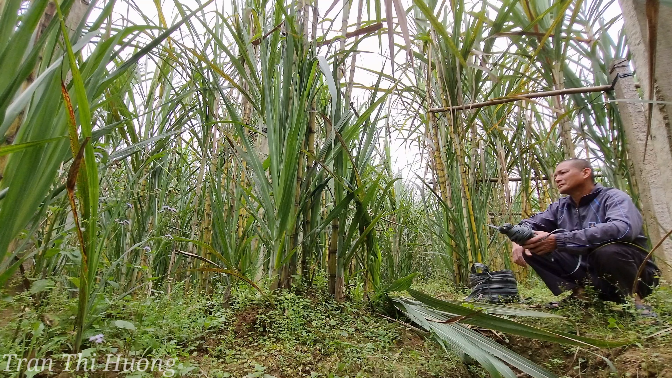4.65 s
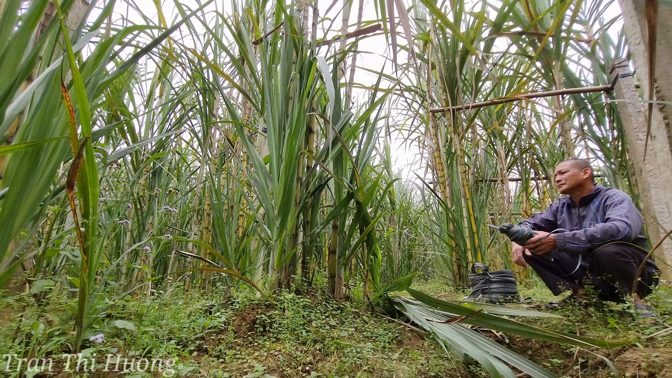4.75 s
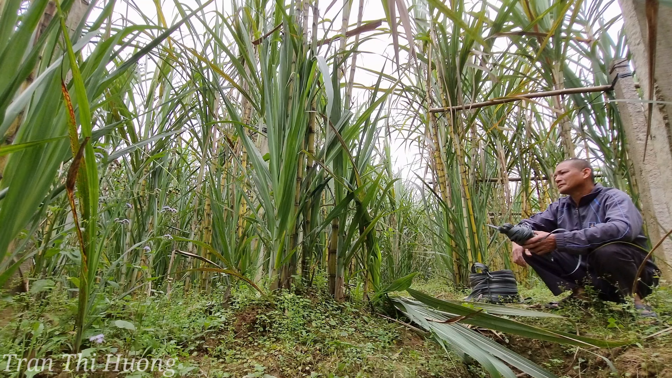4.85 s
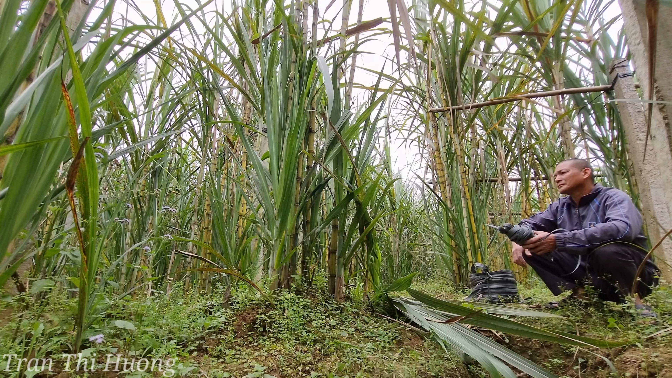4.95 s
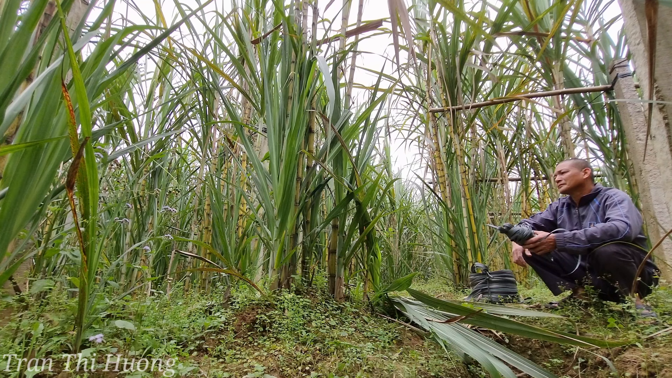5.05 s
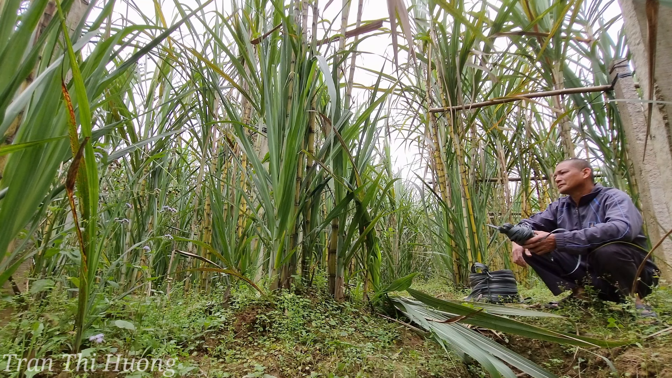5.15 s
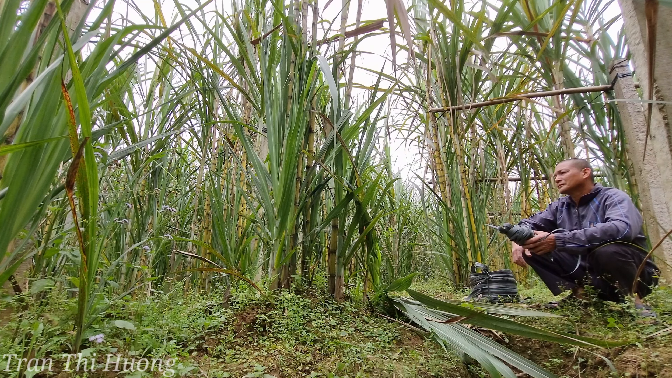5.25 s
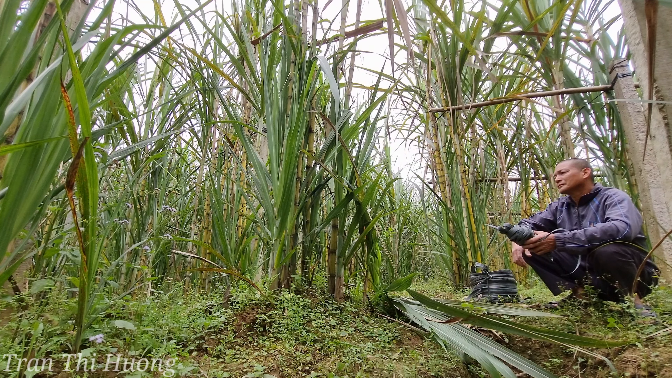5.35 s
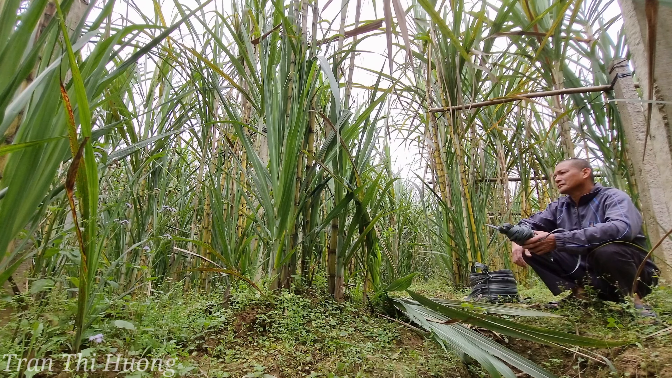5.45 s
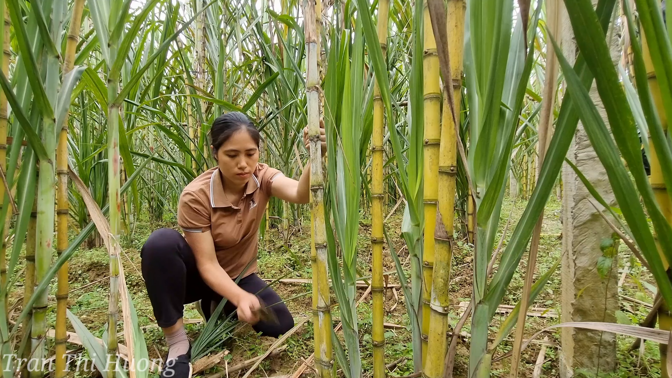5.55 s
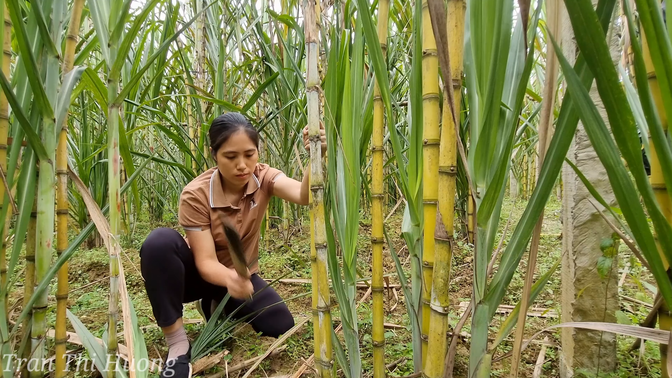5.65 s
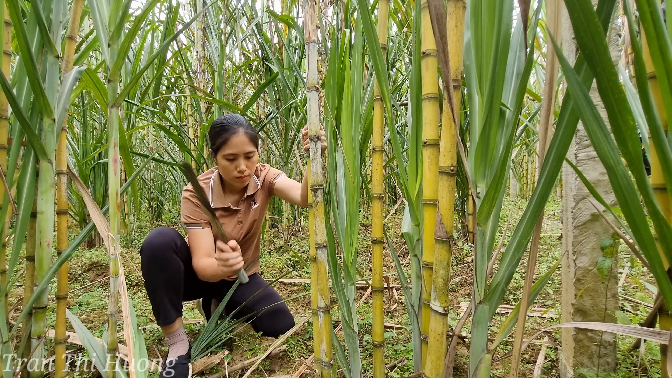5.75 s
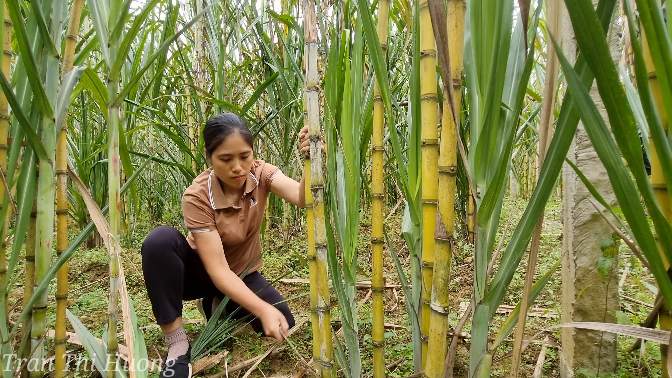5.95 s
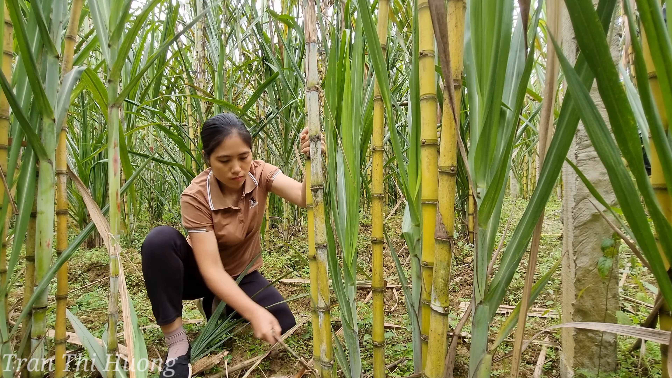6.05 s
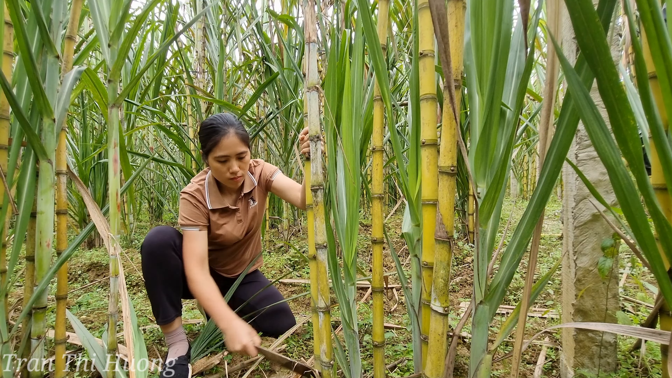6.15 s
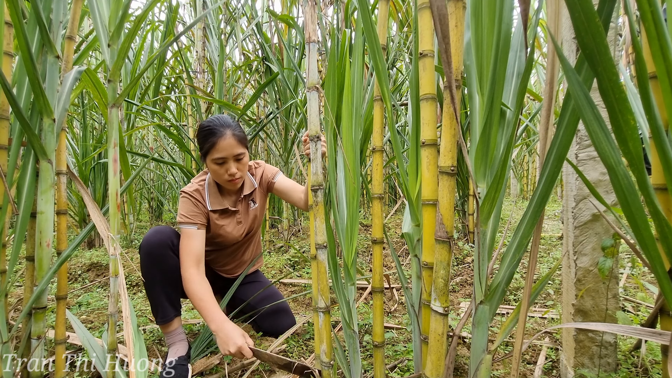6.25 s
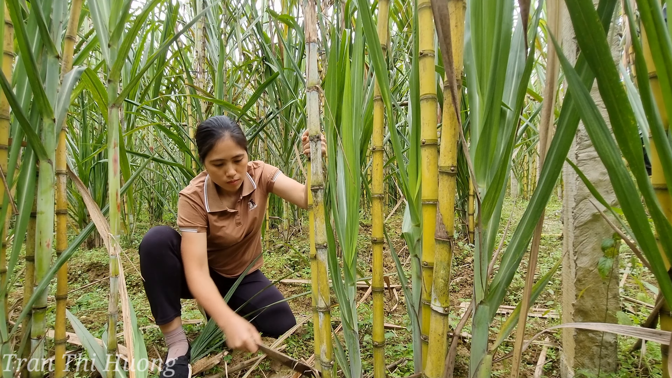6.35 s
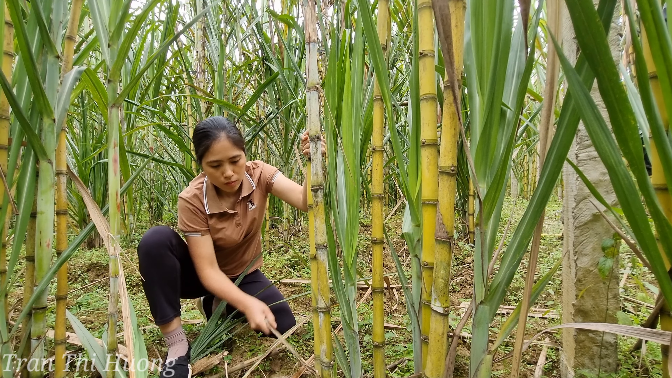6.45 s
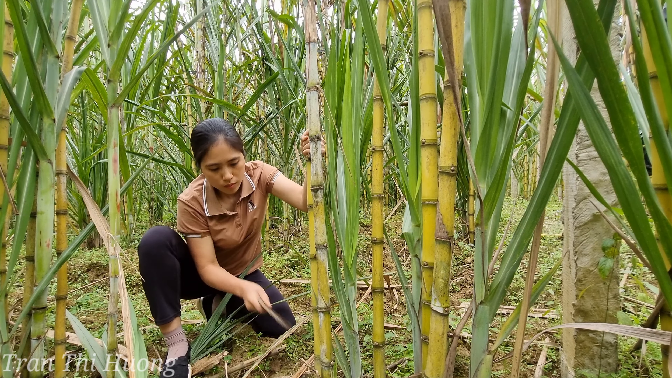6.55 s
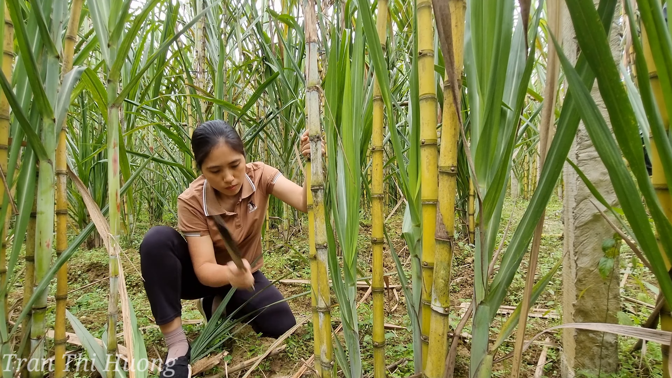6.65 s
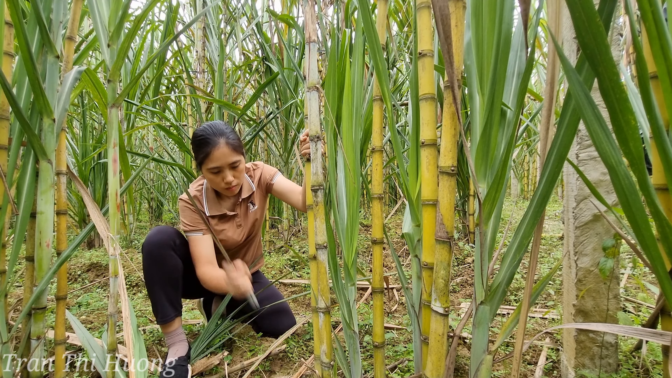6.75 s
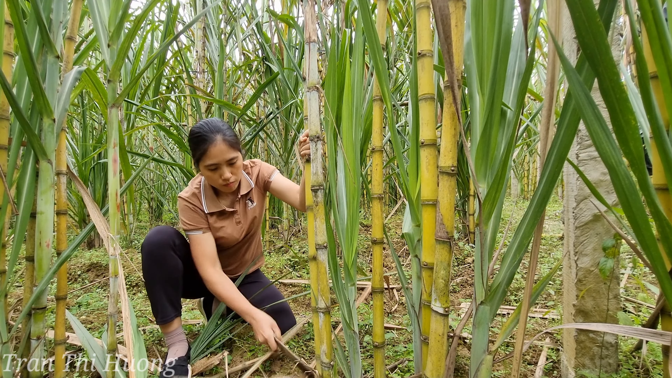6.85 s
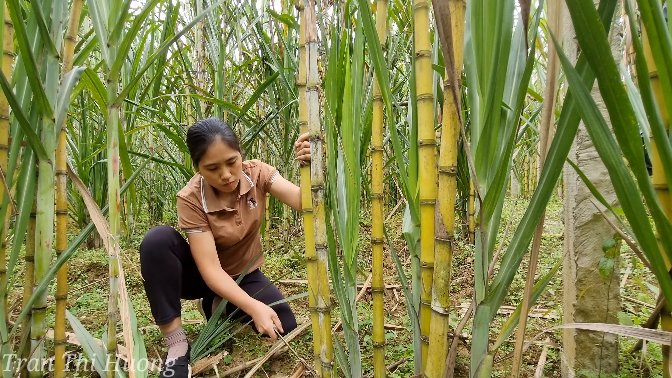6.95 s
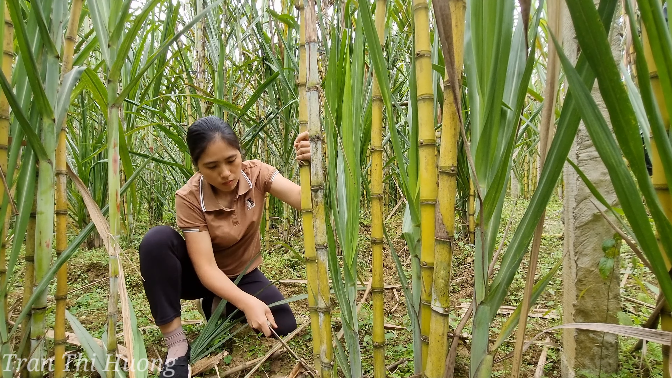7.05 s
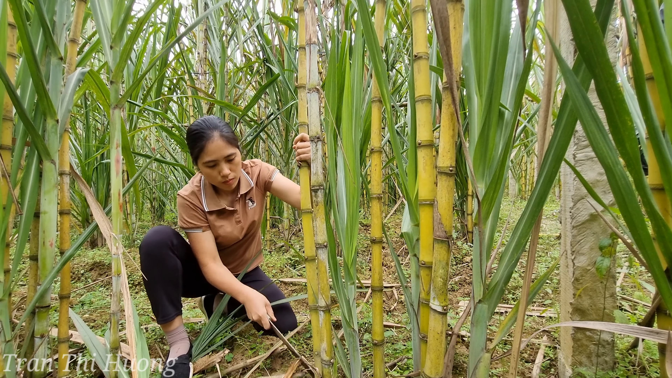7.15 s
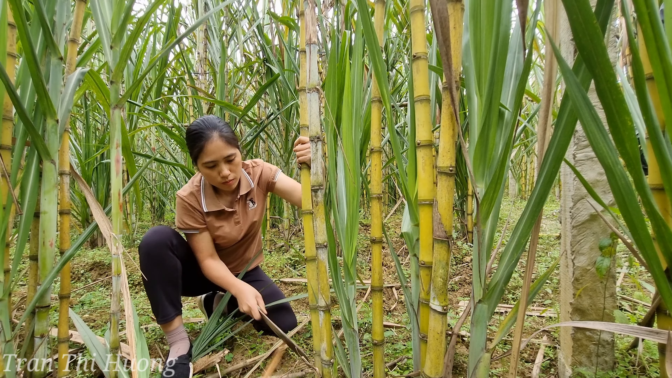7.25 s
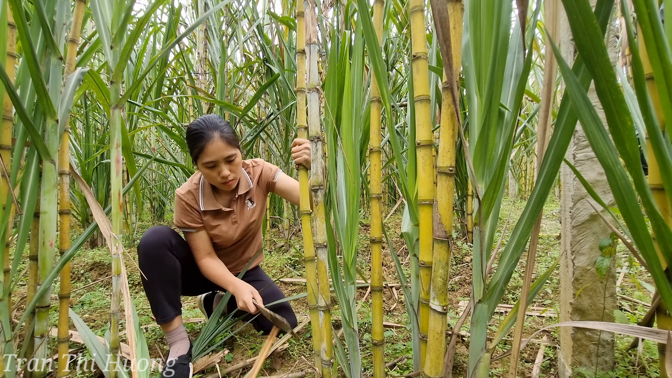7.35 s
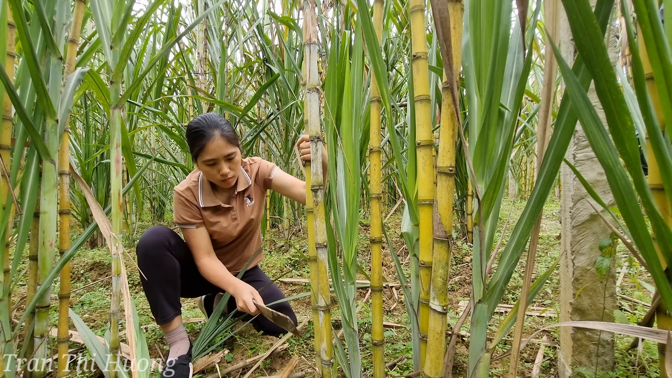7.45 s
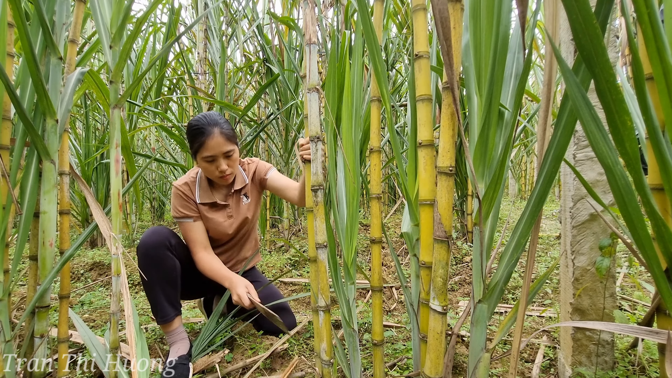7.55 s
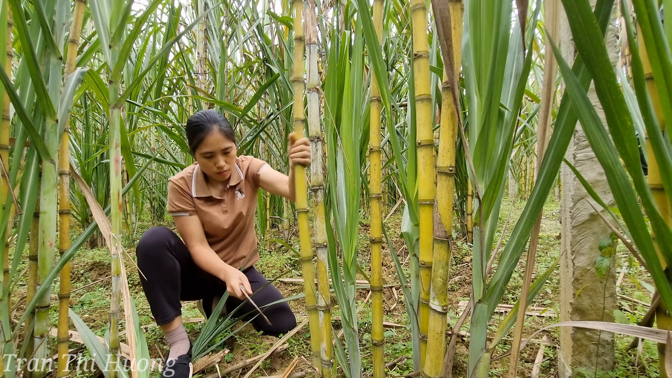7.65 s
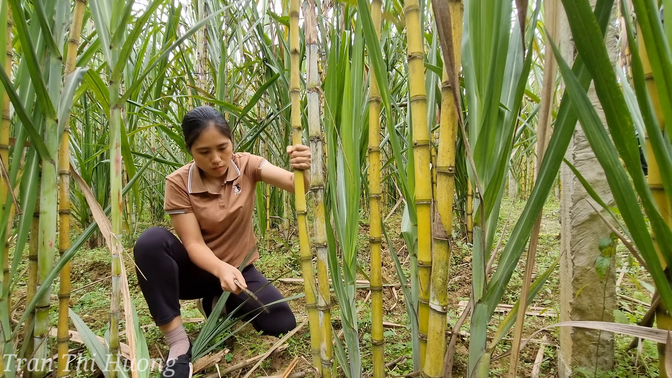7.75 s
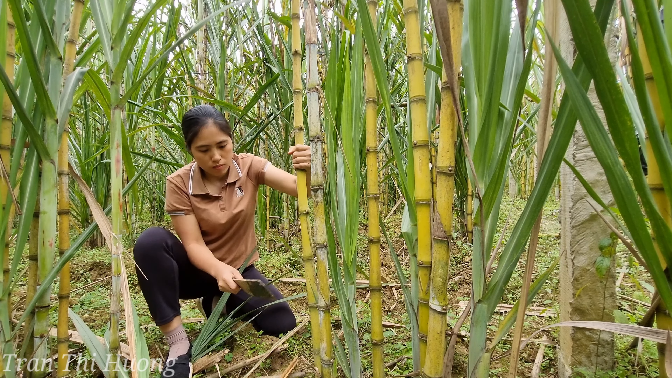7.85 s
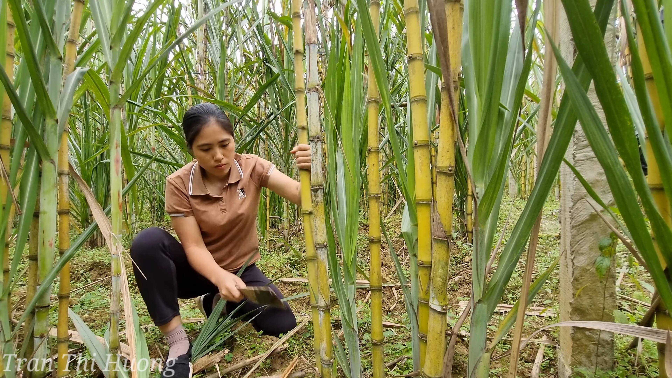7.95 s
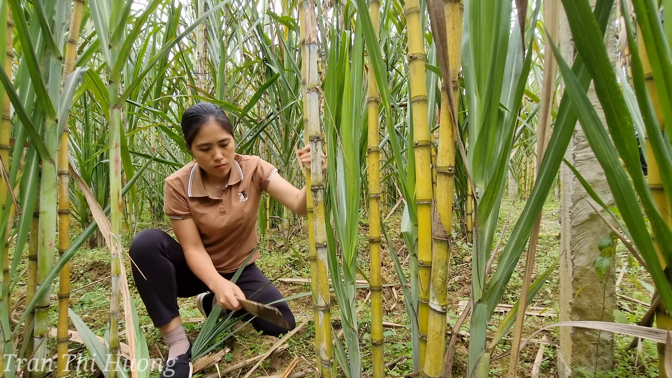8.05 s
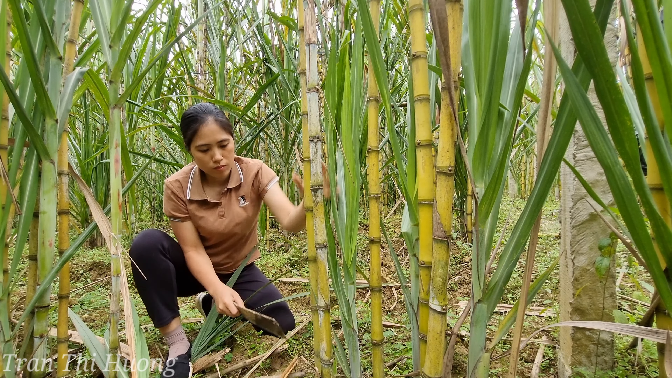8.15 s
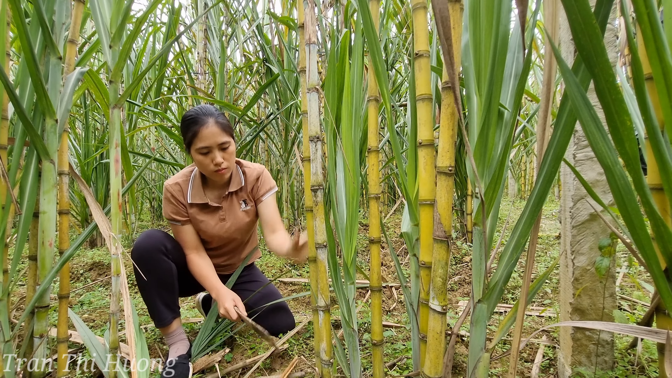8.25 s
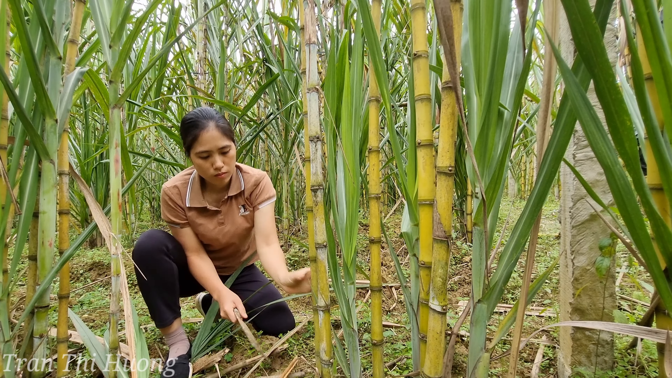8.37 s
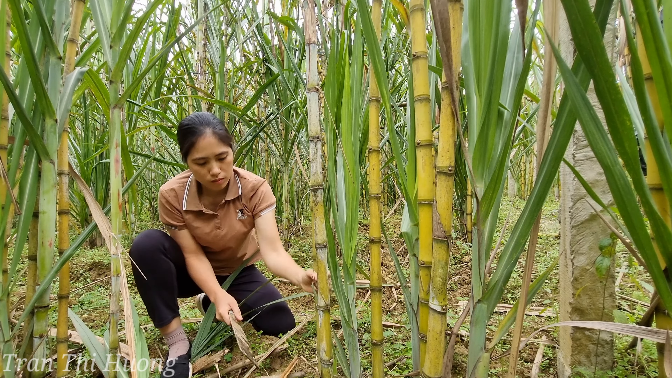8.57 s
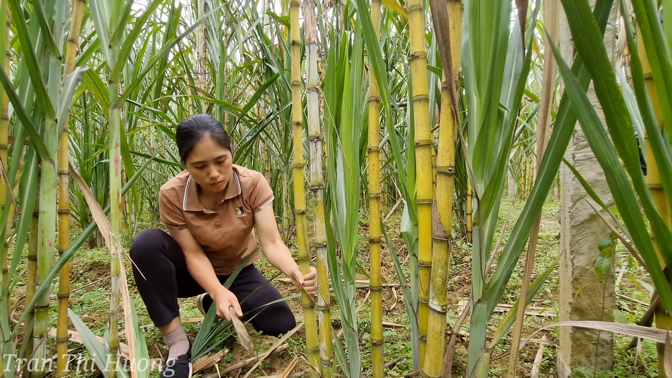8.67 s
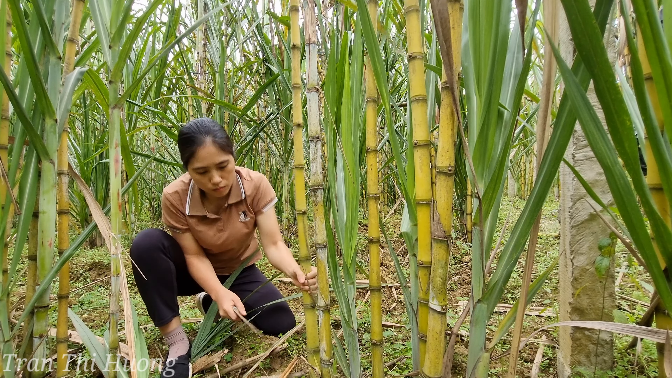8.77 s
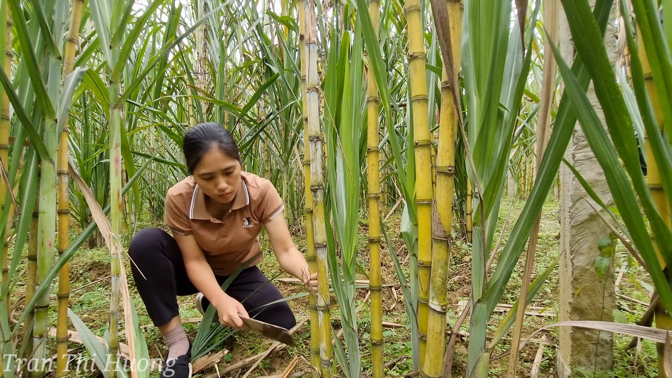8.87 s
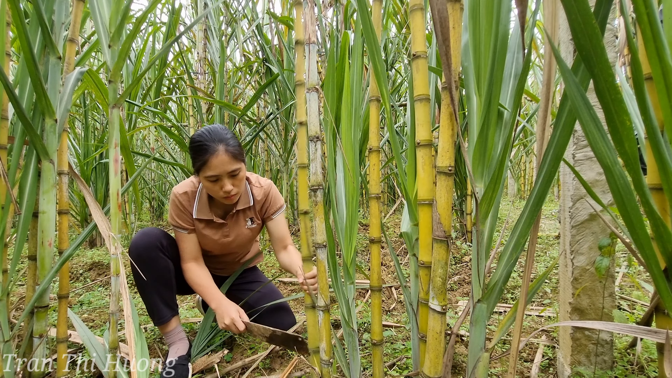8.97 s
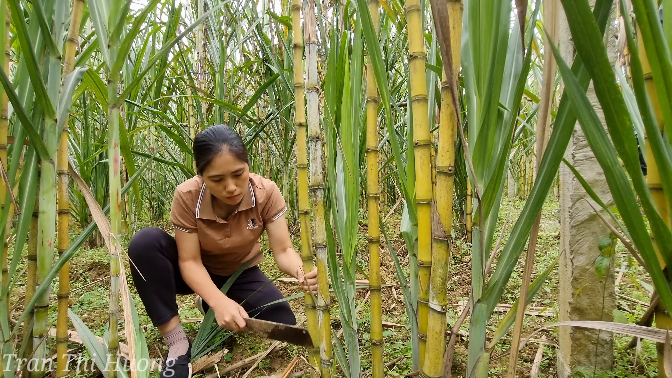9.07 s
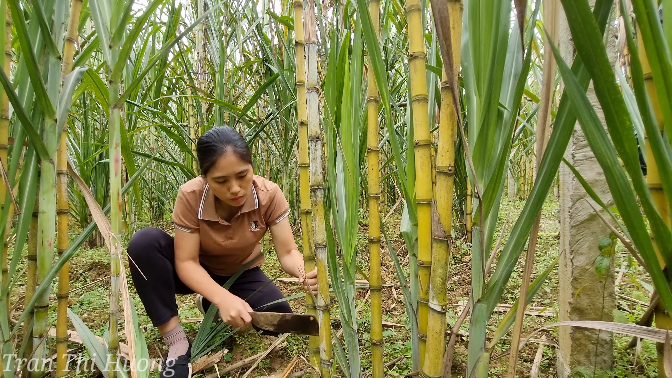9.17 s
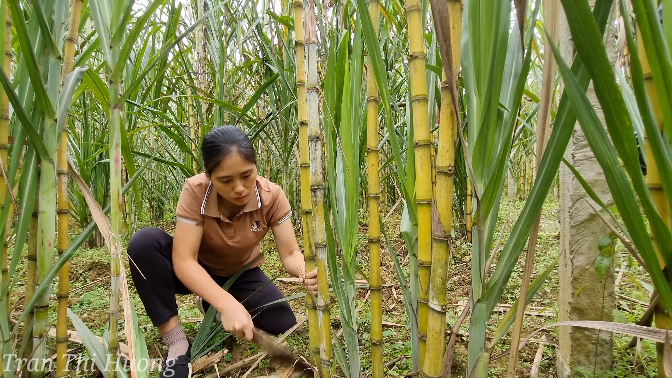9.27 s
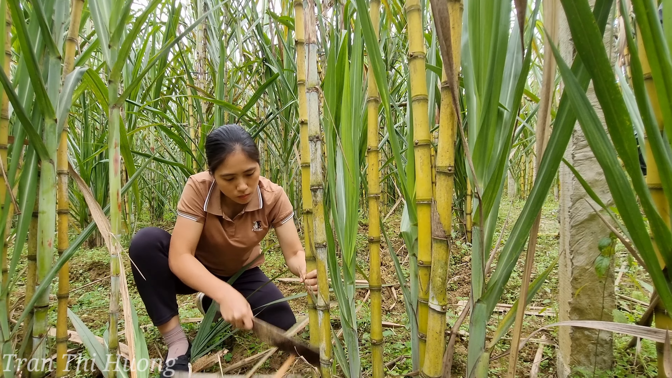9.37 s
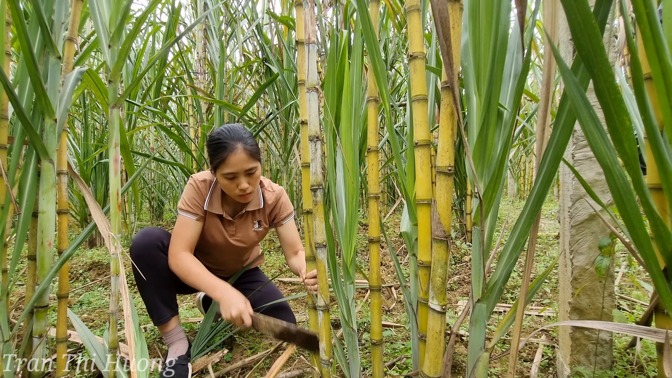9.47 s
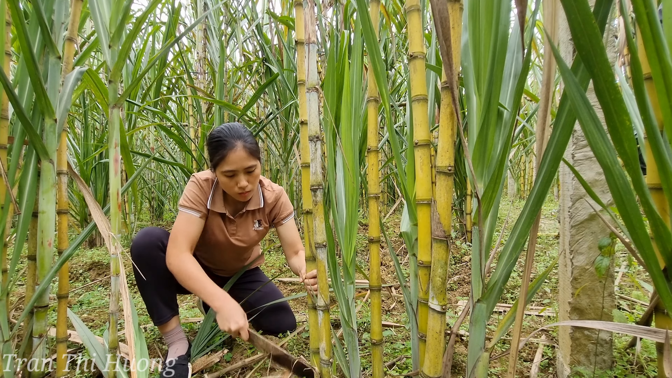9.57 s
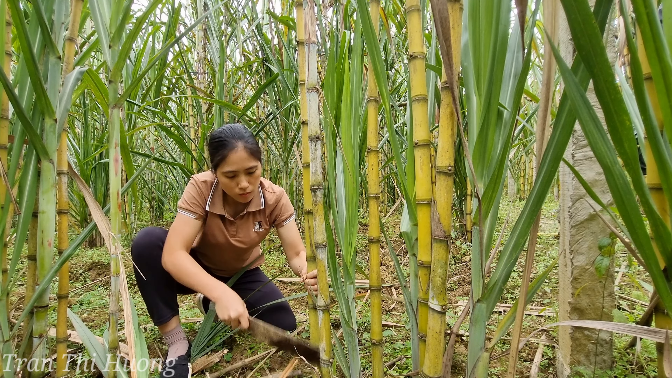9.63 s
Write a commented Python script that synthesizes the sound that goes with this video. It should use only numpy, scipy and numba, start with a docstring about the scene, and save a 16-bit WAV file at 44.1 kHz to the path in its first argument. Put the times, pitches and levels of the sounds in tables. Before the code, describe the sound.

Dry leaves rustle and snap as a sugarcane stalk is pulled down, then a blade chops stalks close by, over a faint distant engine.

```python
"""Dry leaves rustle as a stalk is pulled down through a cane field, over a far engine's hum, a faint
tone and a low rumble. The leaves hiss as they slide, tick as they crease and snap as they break;
stalks bump dully against the ground or each other. After a short silence comes a second scene:
a blade chops stalks close by, each blow a crack, a crunch of tearing fibres and a thud."""
import sys
import numpy as np
from scipy import signal
from scipy.fft import rfft, irfft, next_fast_len
from scipy.io import wavfile
from scipy.ndimage import uniform_filter1d
from numba import njit

SR = 44100
rng = np.random.default_rng(int(sys.argv[2]) if len(sys.argv) > 2 else 0)


def store_wav(level_fs):
    """Save 16-bit WAV to argv[1]."""
    pcm = np.round(np.clip(np.atleast_2d(level_fs), -1, 1) * 32767)
    wavfile.write(sys.argv[1], SR, pcm.T.astype(np.int16))


N = 432621
T = np.arange(N) / SR
FIRST_END_S, SECOND_START_S = 5.540, 5.605
FIRST_SCENE = T < FIRST_END_S


def undb(db):
    """Turn decibels into a plain multiplier."""
    return 10 ** (np.asarray(db) / 20)


def level(x, db):
    """Set a sound's average (rms) level."""
    return x * undb(db) / np.sqrt(np.mean(x ** 2))


def curves(*tables):
    """Join timed rows with straight lines: one curve for each column after the time."""
    s, *columns = np.transpose(np.vstack(tables))
    return [np.interp(T, s, c) for c in columns]


def colour(x, points):
    """Turn pitches up or down along a line of (f/Hz, gain/dB) points."""
    hz, db = np.transpose(points)
    size = next_fast_len(N)
    f = np.maximum(np.arange(size // 2 + 1) * SR / size, 1)
    gain = undb(np.interp(np.log(f), np.log(hz), db))
    return irfft(rfft(x, size) * gain, size)[..., :N]


def band(x, lo, hi):
    """Keep the pitches from lo to hi Hz, with soft edges."""
    return colour(x, [(lo / 1.6, -40), (lo, -3), (lo * 1.15, 0),
                      (hi / 1.15, 0), (hi, -3), (hi * 1.6, -40)])


def wander(per_s):
    """A smooth random wobble, heading for a new value per_s times a second."""
    k = int(SR / per_s)
    steps = np.repeat(rng.standard_normal(N // k + 1), k)
    return uniform_filter1d(uniform_filter1d(steps, k), k)[:N]


def wide_noise():
    """Noise nearly the same left and right in the bass, unrelated in the treble."""
    mid, side = rng.standard_normal((2, N))
    side = colour(side, [(30, -21.5), (250, -7.5), (1000, 1), (4000, .5)])
    return mid + side * np.array([[1], [-1]])


@njit
def rings(n, s, hz, t60, left, right, lag):
    """Tones that start at times s and fade 60 dB in t60 seconds; the left is lag samples later."""
    out = np.zeros((2, n + 64))
    for g in range(len(s)):
        step = np.exp(complex(-np.log(1000) / (t60[g] * SR), 2 * np.pi * hz[g] / SR))
        tone, start = step, int(s[g] * SR) + 24
        for j in range(start, min(start + int(t60[g] * SR), n)):
            out[0, j + int(lag[g])] += left[g] * tone.imag
            out[1, j] += right[g] * tone.imag
            tone *= step
    return out[:, 24:n + 24]


def fibre_ticks(s, hz, cycles, db, pan_db, lag):
    """Tiny cracks of dry fibre, a few cycles long, of equal energy whatever the pitch."""
    size = undb(db) * np.sqrt(hz / 4000)
    left, right = size * undb(pan_db / 2), size * undb(-pan_db / 2)
    return rings(N, *map(np.ravel, (s, hz, cycles / hz, left, right, np.clip(lag, -20, 20))))


def swells(s, db, rise_db_s, fall_db_s):
    """Total power of movements that each rise to a peak and fall away."""
    coarse_t = T[::64]
    late = coarse_t[:, None] - s
    swell_db = db + np.where(late < 0, rise_db_s * late, -fall_db_s * late)
    return np.interp(T, coarse_t, undb(2 * swell_db).sum(axis=1))


# A stalk dragged through leaves: t/s, level/dB, stem scrape gain/dB, leaf slap gain/dB, hiss gain/dB
STALK_DRAG = [(0.0, -39.5, -15, -5.5, -3.5), (0.25, -41, -17, -6.5, -2), (0.4, -47, -10.5, -6, -4),
              (0.88, -47.5, -10, -7.5, -7), (1.0, -45, -8, -3.5, -3.5), (1.59, -43.5, -16.5, -5.5, -4.5),
              (1.8, -35, -12.5, -6.5, -3), (2.43, -34.5, -13.5, -5.5, -4.5), (2.65, -34.5, -10.5, -2, -4.5),
              (3.0, -40, -9, -4.5, -3), (3.22, -34.5, -13, -4.5, -2.5), (3.5, -34, -11, -2.5, -3.5),
              (4.3, -38, -12, -3.5, -3.5), (4.5, -44.5, -5.5, -8.5, -3.5), (4.68, -46.5, -12, -8.5, -5),
              (4.9, -40.5, -15.5, -14, -5), (5.09, -55, -15, -8, -2), (5.13, -42.5, -13.5, -12, -5.5),
              (5.31, -43.5, -16, -14, -4), (5.53, -77, -2, -2.5, -8)]
# Leaves handled between blows: t/s, level/dB, hiss gain/dB
LEAF_HANDLING = [(5.62, -69.5, -5), (5.78, -64.5, -8), (5.92, -64, -6), (6.4, -60, -7.5), (6.95, -70.5, -9),
                 (7.1, -54.5, -7), (7.7, -55, -7), (7.9, -50.5, -4.5), (8.15, -53, -6.5), (8.5, -47.5, -6),
                 (8.85, -52.5, -6), (9.05, -47.5, -7), (9.17, -51, -8), (9.32, -49.5, -9), (9.6, -55, -6),
                 (9.81, -59.5, -4)]
# Single sweeps of a long leaf: peak t/s, level/dB, fall/(dB per s)
LEAF_SWISHES = [(.09, -39.5, 43), (1.4, -42, 202), (1.5, -36, 126), (1.67, -35.5, 70), (1.77, -43, 150),
                (2.125, -35.5, 300), (2.17, -34.5, 98), (2.31, -37.5, 82), (2.67, -40, 82), (2.85, -36, 80),
                (3.57, -31.5, 92), (4.44, -37.5, 47), (4.75, -41.5, 100), (4.825, -37.5, 53),
                (5.132, -34.5, 72), (7.34, -50.5, 90), (7.94, -44, 200), (8.0, -51, 152),
                (8.336, -49.5, 150), (8.74, -42, 200), (9.09, -47.5, 104), (9.731, -51.5, 202)]
def leaf_motion():
    """How hard the leaves move: dragging or handling, single swishes and a shake after each chop."""
    drag_db, stem_db, slap_db, hiss_db = curves(STALK_DRAG)
    hand_db, hand_hiss_db = curves(LEAF_HANDLING)
    swish_s, swish_db, fall_db_s = np.transpose(LEAF_SWISHES)
    chop_s, chop_db, _, _, bite_s, *_ = np.transpose(BLADE_BLOWS)
    power = undb(2 * np.where(FIRST_SCENE, drag_db, hand_db))
    power += swells(swish_s, swish_db, rise_db_s=299, fall_db_s=fall_db_s)
    power += swells(chop_s + bite_s, chop_db - 31, rise_db_s=3000, fall_db_s=207)
    return (10 * np.log10(power), np.where(FIRST_SCENE, stem_db, -9),
            np.where(FIRST_SCENE, slap_db, -5), np.where(FIRST_SCENE, hiss_db, hand_hiss_db))


# The tone colour of the rustle as heard, with the microphone's peak near 8 kHz: f/Hz, gain/dB
RUSTLE_COLOUR = [(150, -27), (300, -22), (500, -15.5), (900, -17.5), (1500, -14.5), (2800, -3.5),
                 (4500, -2), (6500, -5.5), (7900, -1.5), (9200, -8.5), (14800, -7), (16000, -20)]
def rustle(count=60000):
    """Long leaves hiss past each other while their edges tick from all sides; big ticks are rare."""
    when, pitch, size, length = rng.random((count, 4)).T
    pan, lag = rng.standard_normal((count, 2)).T
    ticks = fibre_ticks(when * N / SR, hz=200 + 15800 * pitch ** 1.462, cycles=9 * (.5 + length),
                        db=-1.5 * np.log(size + 1e-9), pan_db=3 * pan, lag=-3 + 6 * lag)
    ticks *= undb(2.5 * wander(70))  # a creasing leaf ticks in short clumps
    leaves = colour(level(ticks, -4) + level(wide_noise(), 0), RUSTLE_COLOUR)
    motion_db, stem_db, slap_db, hiss_db = leaf_motion()
    # Each band flickers on its own: low f/Hz, high f/Hz, gain/dB
    bands = [(250, 1100, stem_db), (1100, 1900, slap_db - 3), (1900, 3000, .56 * slap_db - 3),
             (3000, 5500, -3), (5500, 9300, -3), (9300, 17000, hiss_db)]
    return sum(level(band(leaves, lo, hi), 0) * undb(motion_db + db + 2 * wander(30))
               for lo, hi, db in bands)


# The far engine in each scene: t/s, firing f/Hz, level/dB
ENGINE_FIRST = [(0.0, 65.05, -44), (0.95, 64.96, -41), (1.28, 64.5, -51), (2.3, 65.4, -49.5),
                (3.0, 64.4, -47.5), (3.75, 62.6, -45), (3.95, 61.9, -52), (4.34, 61.26, -44),
                (4.9, 61.63, -40), (5.53, 61.8, -42.5)]
ENGINE_SECOND = [(5.62, 87.5, -59), (6.4, 86.7, -54), (7.05, 86.55, -61), (7.6, 84, -60),
                 (8.1, 81.75, -62.5), (9, 80.2, -57.5), (9.81, 79.1, -61)]
# Its tones in each scene: multiple of the firing rate, gain/dB
TONES_FIRST = [(1, 0.5), (2, -23.5), (8, -23.5)]
TONES_SECOND = [(1, 0), (2, -12.5), (2.5, -21.5), (3, -15), (3.5, -12), (4, -20.5), (4.5, -16)]
def engine():
    """A far engine's firing makes a hum and overtones, each wavering with the air in between."""
    hz, db = curves(ENGINE_FIRST, ENGINE_SECOND)
    phase = 2 * np.pi * np.cumsum(hz * (1 + .01014 * wander(20))) / SR
    first, second = (sum(undb(gain + 1.6 * wander(10)) * np.sin(k * phase + k) for k, gain in tones)
                     for tones in (TONES_FIRST, TONES_SECOND))
    return np.sqrt(2) * undb(db + 1.5 * wander(3)) * np.where(FIRST_SCENE, first, second)


# A faint low tone: t/s, f/Hz, level/dB
FAINT_TONE = [(0, 187, -59.5), (.5, 186, -59.5), (1.7, 184, -57), (2, 182, -79)]
def faint_tone():
    """One fluttering tone that all but vanishes after two seconds."""
    hz, db = curves(FAINT_TONE)
    return undb(db + 4.2 * wander(21)) * np.sin(2 * np.pi * np.cumsum(hz) / SR)


# The tone colour of the fields' rumble in each scene: f/Hz, gain/dB
RUMBLE_FIRST = [(20, -33), (32, -19), (42, 2.5), (75, -2.5), (120, -9.5), (190, -10.5), (260, -19.5),
                (500, -17), (900, -38)]
RUMBLE_SECOND = [(15, -37), (25, -8), (61, 0.5), (89, 1), (133, -2), (209, -8), (305, -10.5), (648, -22),
                 (3340, -39), (7700, -49), (15500, -47)]
def rumble():
    """A low roar from afar that gently rises and falls."""
    air = wide_noise()
    first, second = level(colour(air, RUMBLE_FIRST), -48), level(colour(air, RUMBLE_SECOND), -59)
    return np.where(FIRST_SCENE, first, second) * undb(2 * wander(3.88))


# The tones in one sharp crack: multiple of its pitch, gain/dB
CRACK_TONES = [(.45, -2.5), (0.701, -19), (1, 3), (1.5, -4.5), (2.2, -3)]
def cracks(columns, pan_db, hold_s, swell_s, count):
    """Sharp cracks, each in a crunch of count tearing fibres that swells, holds and dies away."""
    s, db, hz, crunch_db, t60, tilt = np.array(columns)[:, :, None]
    when, pitch, size, delay = np.moveaxis(rng.random((len(s), count, 4)), -1, 0)
    scatter = rng.standard_normal((len(s), count))
    span = swell_s + hold_s + 1.5 * t60
    late = when ** 2 * span - swell_s
    dying_s = np.maximum(late - hold_s, 0)
    rise_db = 20 * np.minimum(late, 0) / swell_s
    fall_db = np.maximum(-60 * dying_s / t60, -9 - 20 * dying_s / t60)  # fast, then a faint lingering tail
    # Fibres break more and more seldom, so each late one carries more of the sound.
    sparse_db = 10 * np.log10((when + .03) * span / count * 2500)
    fibre_hz = 300 + 15700 * pitch ** 1.443
    # The struck body favours fibres near its own pitch, most while the blow lasts.
    body_db = 5.5 * np.exp(-(np.log2(fibre_hz / hz) / .3) ** 2 - dying_s / .018)
    fibre_db = db + crunch_db + rise_db + fall_db + sparse_db + body_db
    fibre_db += tilt * np.log2(fibre_hz / 4000) - np.log(size + 1e-9)
    crunch = fibre_ticks(s + late, fibre_hz, 12.6, fibre_db, pan_db, lag=-2.2 + 3.3 * scatter)
    multiple, gain_db = np.transpose(CRACK_TONES)
    tones = len(multiple)
    tone_s = s + .0014 * delay[:, :tones]  # the break runs through in about a millisecond
    tone_hz = np.minimum(hz * multiple, 15000)
    tone_db = db + gain_db + tilt * np.log2(multiple) - 3.5
    crack = fibre_ticks(tone_s, tone_hz, 9.6, tone_db, pan_db, lag=-2.2 + scatter[:, :tones])
    return colour(crack + crunch, [(60, -25.5), (300, -3), (2000, -1.5), (6500, 1),
                                   (7900, 3), (9500, -3), (16000, -2.5)])


# Sharp cracks of leaves and stalks, including a second knock inside two blade blows:
# t/s, crack level/dB, crack f/Hz, crunch gain/dB
SHARP_SNAPS = [(1.407, -24, 4160, -3.5), (1.491, -19, 2480, -19), (1.64, -20, 5000, -12),
               (1.746, -15, 4100, -10), (1.772, -15, 5020, -6.5), (1.842, -18, 7400, -13),
               (1.93, -20, 4990, -12), (1.998, -19, 2200, -4.5), (2.029, -13.5, 4040, -6),
               (2.108, -4.5, 4940, -16), (2.111, -11.5, 7860, -8), (2.144, -20, 1500, -9),
               (2.157, -9.5, 5700, -8), (2.268, -17, 5000, -7), (2.85, -15, 1660, -12),
               (3.416, -12.5, 2930, -5.5), (3.448, -15.5, 1700, 0), (3.46, -23, 1300, 0.5),
               (3.565, -4, 3040, -8.5), (3.66, -14, 4000, -5.5), (3.712, -14.5, 2500, -6.5),
               (4.747, -21, 3970, -9), (4.824, -19, 4485, -8), (5.12, -27, 3260, -0.5),
               (5.663, -40, 9400, -4), (5.682, -41.5, 9000, -6.5), (5.774, -27, 7100, -9),
               (5.815, -36.5, 8050, -10.5), (6.041, -7, 1300, -11.5), (6.078, -19, 7360, -10.5),
               (6.086, -18.5, 4200, -12), (6.137, -37, 7400, -13), (6.183, -24, 6000, -8.5),
               (6.197, -24, 7500, -2), (6.264, -23, 6100, -6), (6.319, -24, 3200, -7),
               (6.978, -4, 1708, -22.5), (7.092, -30, 1500, -12), (7.304, -32, 7900, -14),
               (7.331, -31.5, 4000, -1.5), (7.358, -24.5, 1130, -7), (7.446, -28, 5830, -7),
               (7.556, -31.5, 2070, -3), (7.825, -22, 3050, -9), (8.336, -30, 2813, -4),
               (8.446, -27, 10100, -11.5), (8.515, -15.5, 8120, -13.5), (8.555, -28, 3015, -6),
               (8.716, -15, 3050, -7.5), (8.732, -25.5, 3810, 0.5), (8.756, -22, 1590, -3.5),
               (8.914, -27.5, 2000, -7.5), (9.003, -32, 7050, -4), (9.385, -17, 2900, -17),
               (9.443, -26, 7270, -11)]
def snaps():
    """Leaves and stalks crack sharply, with little bass."""
    s, db, hz, crunch_db = np.transpose(SHARP_SNAPS)
    t60 = .05 * 2 ** (crunch_db / 13)  # a weaker crunch ends sooner
    tilt = 3 * np.log2(hz / 2280)  # thin leaves snap higher and brighter
    breaks = cracks([s, db, hz, crunch_db, t60, tilt], pan_db=0, hold_s=0, swell_s=.00088, count=300)
    return colour(breaks, [(250, -13.5), (900, -2), (16000, 2)])


# How stalk and soil ring: multiple of the thud's pitch, gain/dB, fade time/s
THUD_TONES = [(1, 3, 0.11), (1.5, -6, 0.17), (2.7, -10.5, 0.04), (3.4, -12.5, 0.038), (4.9, -10, 0.064)]
def thuds(s, db, hz):
    """Stalk and soil ring dully after a blow."""
    multiple, gain_db, t60 = np.transpose(THUD_TONES)
    size = undb(db[:, None] + gain_db).ravel()
    starts, pitches = np.repeat(s, len(multiple)), np.outer(hz, multiple).ravel()
    ringing = rings(N, starts, pitches, np.tile(t60, len(s)), size, size, np.zeros_like(size))
    return colour(ringing, [(30, -43), (60, 0), (700, 5.5), (1500, -26)])


# Soft knocks of a stalk: t/s, level/dB, f/Hz
STALK_BUMPS = [(1.489, -51, 127), (2.871, -40, 111.4), (4.442, -41, 124), (4.501, -44.5, 272),
               (5.104, -39, 251), (5.122, -36.5, 122), (5.14, -43.5, 400), (5.17, -38, 88.5),
               (5.484, -40, 60.8), (6.035, -35, 150), (7.557, -45.5, 99), (8.753, -43.5, 92.6),
               (8.913, -48, 103), (9.092, -44.5, 101)]
def bumps():
    """A stalk bumps the ground or its neighbours."""
    return thuds(*np.transpose(STALK_BUMPS))


# Blows of the blade: t/s, crack level/dB, crack f/Hz, crunch gain/dB, bite/s, swell/s,
# thud gain/dB, thud f/Hz, treble tilt/(dB per octave)
BLADE_BLOWS = [(6.034, -10, 1330, -2, 0.0084, 0.001, -19.5, 71.4, 1),
               (6.219, -6, 4170, -9, 0.0024, 0.0053, -38, 180, 0.5),
               (6.28, -9.5, 2920, -7.5, 0.0025, 0.0047, -37, 119, 2),
               (6.975, -9.5, 1460, -2.5, .013, 0.0021, -20, 112, 2),
               (7.839, -17.5, 6100, -4, 0.0034, 0.014, -45, 202, 2.5),
               (9.395, -11.5, 3500, -7, 0.0016, 0.025, -31.5, 143.6, 0),
               (9.63, -15, 8000, -6, 0.0085, 0.011, -25.5, 189, 1)]
def chops():
    """The blade sweeps in and bites for a few milliseconds while fibres part; a thud follows."""
    s, db, hz, crunch_db, bite_s, swell_s, thud_db, thud_hz, tilt = np.transpose(BLADE_BLOWS)
    t60 = .05 + 5 * bite_s  # a deeper bite crunches on for longer
    bites = cracks([s, db, hz, crunch_db, t60, tilt], pan_db=1,
                   hold_s=bite_s[:, None], swell_s=swell_s[:, None], count=1800)
    return bites + thuds(s + .0027, db + thud_db, thud_hz)


def scene():
    """The work in the cane, over the sounds from afar."""
    return rustle() + chops() + snaps() + bumps() + engine() + faint_tone() + rumble()


# How much louder the left microphone is than the right: f/Hz, gain/dB
LEFT_OVER_RIGHT = [(30, 1), (500, 1), (2000, 1), (4000, -1), (8000, -2), (16000, -5)]
def record(dry):
    """Each side gets its own tone colour, a silence parts the scenes and the highest treble is cut."""
    stereo = np.array([colour(side, [(hz, sign * db / 2) for hz, db in LEFT_OVER_RIGHT])
                       for side, sign in zip(dry, (1, -1))])
    sudden_stop = np.clip((FIRST_END_S - T) / .004, 0, 1)
    fade_in = np.clip((T - SECOND_START_S) / .076, 0, 1) ** 2
    treble_cut = signal.ellip(10, .2, 70, 15700, fs=SR, output="sos")
    return signal.sosfilt(treble_cut, stereo * np.where(FIRST_SCENE, sudden_stop, fade_in))


dry = scene()
out = record(dry)
store_wav(out)
```